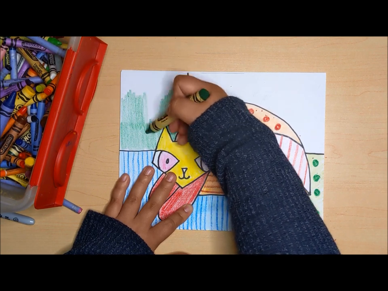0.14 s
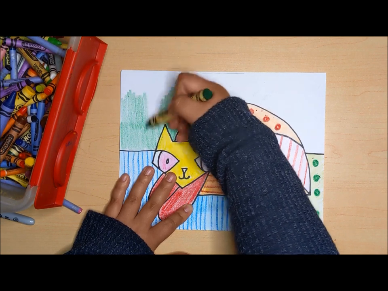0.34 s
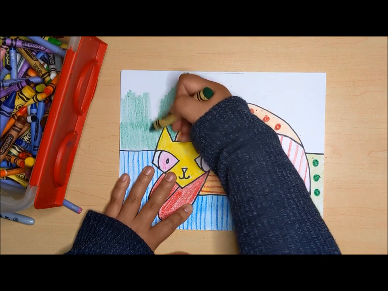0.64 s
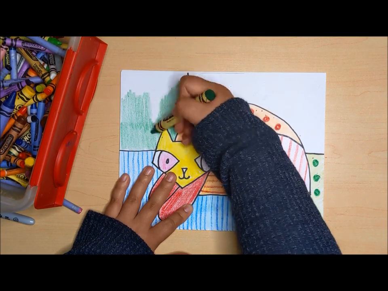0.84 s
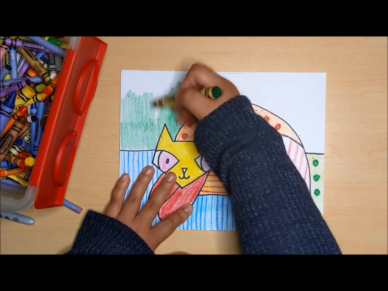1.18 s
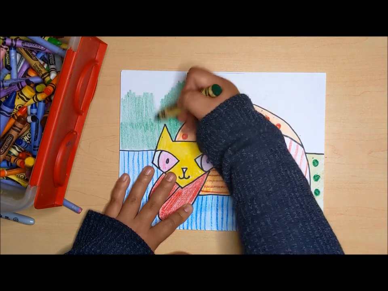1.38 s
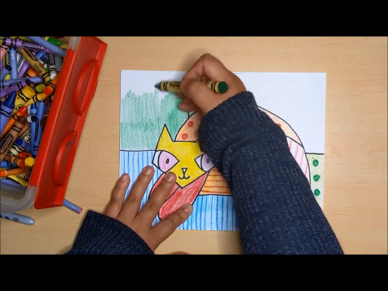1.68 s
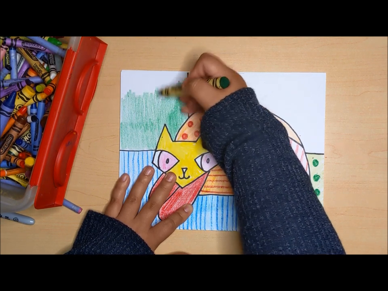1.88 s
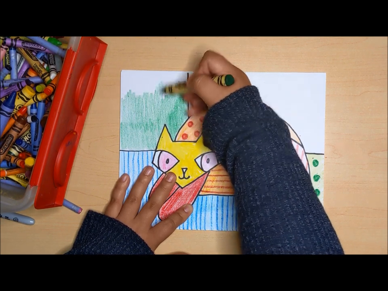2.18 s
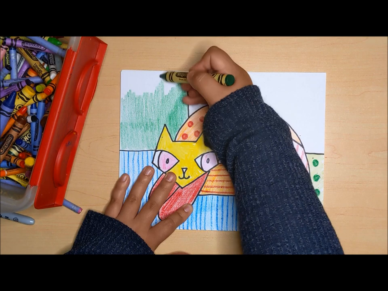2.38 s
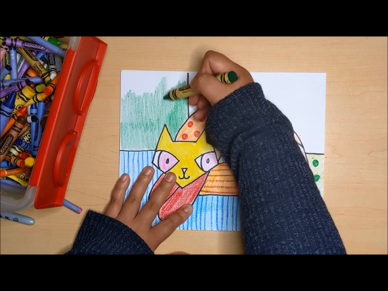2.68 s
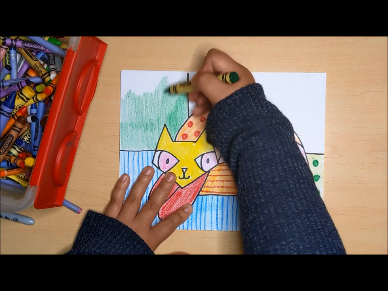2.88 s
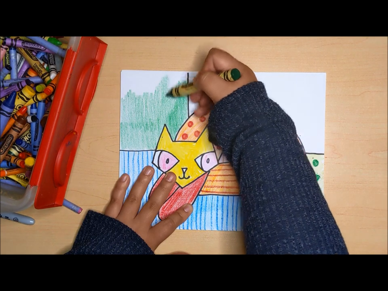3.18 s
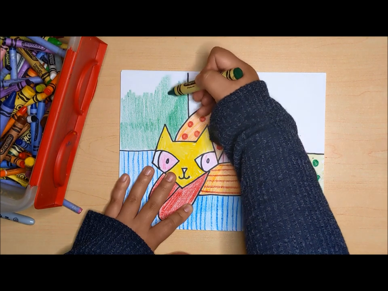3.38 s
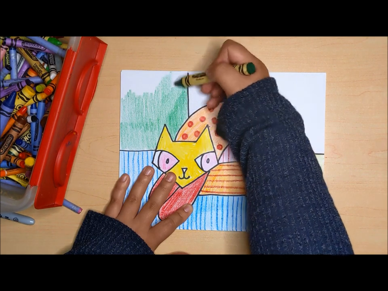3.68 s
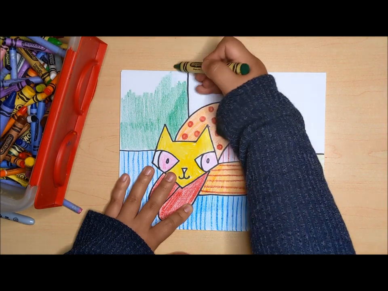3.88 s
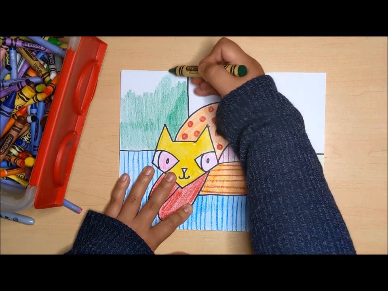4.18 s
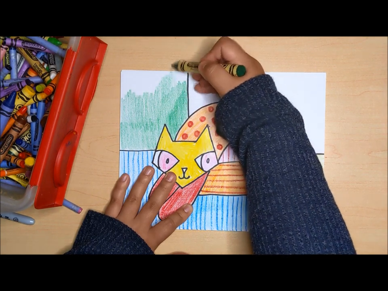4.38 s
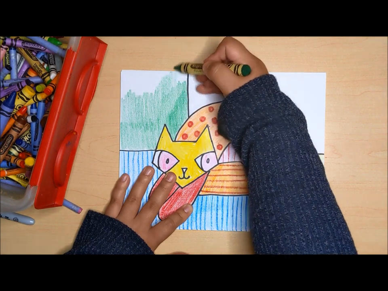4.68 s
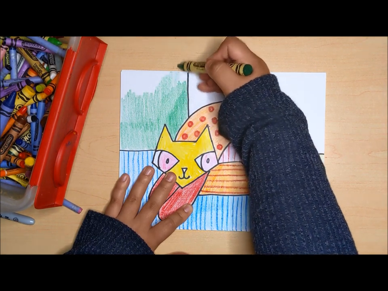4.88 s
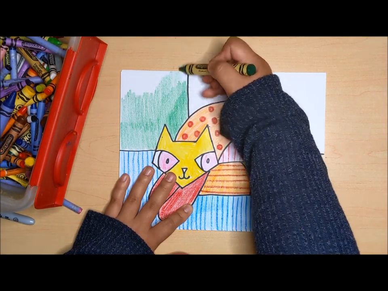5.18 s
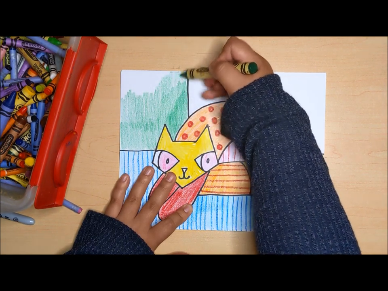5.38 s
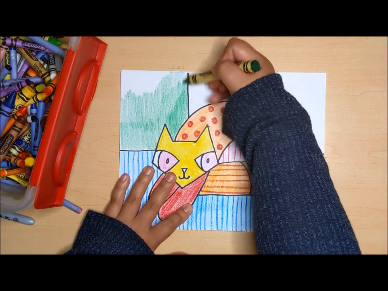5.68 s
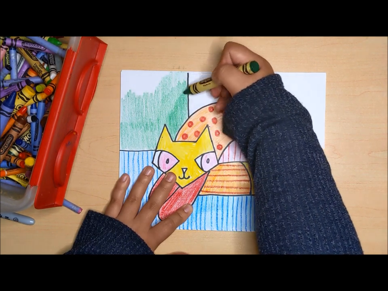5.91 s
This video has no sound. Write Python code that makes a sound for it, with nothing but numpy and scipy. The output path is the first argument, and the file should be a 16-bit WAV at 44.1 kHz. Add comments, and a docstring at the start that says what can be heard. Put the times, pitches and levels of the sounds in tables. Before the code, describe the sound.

A wax crayon rubs quickly back and forth on paper, each stroke a soft, grainy hiss with a slight rumble from the wooden table. A little past halfway, it changes to short single drags that end in much louder, sharp knocks. The hand thumps softly between them, and the paper ticks and slides briefly. Heard close up in a small, quiet room.

```python
"""A wax crayon on paper on a wooden table, heard from close by on a stereo pair in a small quiet room.
First it colours back and forth: each stroke hisses on the paper grain and shakes the table top.
Around 3 s a faint hum swells and fades. From 3.7 s single drags end in hard knocks that snap through
the air and ring through the table and the room. Between them the hand lands with soft thumps,
and from 4.5 s the paper now and then ticks or slides under the hand."""
import sys
import numpy as np
from scipy import signal
from scipy.fft import rfft, irfft, next_fast_len
from scipy.io import wavfile

SR = 44100
rng = np.random.default_rng(int(sys.argv[2]) if len(sys.argv) > 2 else 0)


def output_pcm(signal):
    """Save a mono or channel-first signal as 16-bit PCM at the path in sys.argv[1].

    Samples are clipped to [-1, 1] before scaling.
    """
    pcm = np.clip(np.atleast_2d(signal).T, -1, 1) * 32767
    wavfile.write(sys.argv[1], SR, np.round(pcm).astype(np.int16))


N = 266788

# colour of the room tone: f/Hz, relative level/dB
AIR_COLOUR = [(15, -29), (25, 8), (123, 5.5), (439, -1), (489, -2), (1070, -10), (1370, -6.5), (1700, -11),
              (6560, -22), (7110, -22.5), (10700, -25), (12200, -29), (16000, -31)]
# partials of the hum at its loudest: f/Hz, level/dB
HUM_PARTIALS = [(59.2, -64.5), (118.4, -78)]
# colour of the room tail: f/Hz, relative level/dB
TAIL_COLOUR = [(41, -41), (70, -8.5), (105, -1), (178, -6), (293, -7.5), (403, -1.5), (506, -17.5),
               (620, -5.5), (727, -23), (815, -17.5), (1930, -10), (2840, -17.5), (3740, -19.5),
               (4800, -28), (8860, -35.5), (16000, -44)]
# first echoes off near surfaces: delay/s, left level/dB, right level/dB
NEAR_ECHOES = [(.0072, -20, -18.5), (0.0102, -7, -10.5)]
# the sheet slides under the hand: middle t/s, length/s, level/dB
SHEET_SLIDES = [(5.045, 0.091, -53), (5.137, 0.17, -66), (5.415, 0.063, -55.5)]
# colour of its rustle: f/Hz, relative level/dB
RUSTLE_COLOUR = [(1180, -20), (2000, 9), (2420, 1), (4300, 4.5), (5300, 3), (6470, 1), (7440, 4),
                 (9330, 4.5), (16000, -5)]
# ticks of the paper: t/s, level/dB, centre f/Hz
PAPER_TICKS = [(4.4857, -44, 5020), (4.9477, -35, 9400), (4.9781, -43.5, 12000), (4.9834, -40, 11900),
               (5.408, -21.5, 7950)]
# modes of the table top: f/Hz, level/dB, t60/s, sign of the first swing
TABLE_MODES = [(88, -31, .136, -1), (139, -27, .2, -1), (174, -17, .12, 1), (225, -28, .06, -1),
               (252, -35, .3, 1), (292, -15, .07, -1), (365, -17, .06, -1), (408, -12, .13, -1),
               (444, -15, .055, 1), (572, -14, .055, 1), (588, -26, .2, 1), (651, -13, .03, 1),
               (784, -15, .01, 1), (836, -30, .15, 1), (1036, -15, .01, -1), (1234, -23, .046, 1),
               (1388, -15, .039, -1), (1466, -24, .052, -1), (1526, -16, .035, -1), (1595, -18, .059, -1),
               (1890, -32, .084, 1), (1954, -22, .057, -1), (2096, -25, .16, -1), (2235, -28, .15, 1),
               (2312, -24, .116, 1), (2428, -27, .12, -1), (3000, -22, .01, 1), (3806, -29, .09, 1),
               (3945, -17, .014, 1), (4110, -19, .012, -1)]
# soft landings of the hand: t/s, blow level/dB, contact/ms
HAND_THUMPS = [(3.9488, -17.5, 3.34), (4.2284, -15.5, 1.47), (4.3441, -31.5, 1.1), (4.4868, -14.5, 1.34),
               (4.7444, -14.5, 2.6), (4.986, -16, 2.6), (5.2461, -18, 1.44), (5.4928, -43, 1.1),
               (5.8058, -14.5, 1.16)]
# hard knocks of the crayon: t/s, air snap level/dB, blow level/dB
CRAYON_KNOCKS = [(3.683, -16.5, -9.5), (4.0775, -36, -22), (4.584, -14.5, -10), (4.849, -19, -11.5),
                 (5.0815, -16.5, -6.5), (5.3546, -17, -11.5), (5.611, -16.5, -7.5), (5.9333, -18.5, -11)]
# colouring, one out-and-back swing a row: middle of the out stroke t/s, hiss level/dB, rumble level/dB
COLOURING_SWINGS = [(-0.05, -56.5, -53.5), (0.193, -53.5, -51), (0.427, -56, -51), (0.663, -54, -51),
                    (0.903, -56, -53), (1.14, -54, -51), (1.384, -55, -53.5), (1.617, -53.5, -48.5),
                    (1.851, -56, -53.5), (2.083, -57, -54.5), (2.3, -58, -55.5), (2.529, -58.5, -56),
                    (2.758, -57.5, -58), (2.985, -58.5, -62.5), (3.202, -57.5, -60), (3.43, -58, -65)]
# single drags of the crayon: middle t/s, length/s, hiss level/dB, rumble level/dB
CRAYON_DRAGS = [(3.68, 0.074, -54.5, -55.5), (3.866, 0.071, -63, -77), (4.055, 0.05, -55, -56),
                (4.312, 0.052, -57.5, -55.5), (4.586, 0.074, -54, -47.5), (4.831, 0.065, -55, -55),
                (5.338, 0.068, -55.5, -56.5), (5.596, 0.096, -59, -65), (5.904, 0.037, -56.5, -53.5)]
# colour of wax on paper grain: f/Hz, relative level/dB
HISS_COLOUR = [(530, -49), (900, -4.5), (1190, -11), (1350, 1), (2030, -16), (3020, -11), (3570, -20.5),
               (4280, -7), (4820, -18), (5440, -8.5), (6060, -17), (6990, -10.5), (12400, -7.5),
               (14000, -10), (15800, -12)]
# likeness of diffuse sound at the two capsules: f/Hz, correlation
CAPSULE_LIKENESS = [(60, 0.79), (130, 0.51), (290, 0.33), (640, 0.7), (1410, 0.16), (3100, 0.16),
                    (6820, -0.17), (15000, 0.28)]
# balance of the pair: f/Hz, left minus right level/dB
CAPSULE_BALANCE = [(60, -5.5), (110, -4.5), (200, -4), (380, 1), (700, -2), (1290, -3.0), (2380, -3.5),
                   (4400, -3.5), (8120, -4.5), (15000, -12.5)]
# peak and dips of the microphone housing: f/Hz, width/Hz, level/dB
HOUSING_COLOUR = [(12100, 1800, 0.5), (14100, 890, -11), (15200, 900, -2.5)]

BENDING_LAG = .068   # travel time through the wood, s times root Hz: low bending waves come later
KNOCK_MS, SOFTENS = 0.014, 0.87   # contact of a 0 dB blow; it lengthens by this many dB for each dB less
TOUCH_DB, TOUCH_LEAD_S, TOUCH_MS = -19, .0052, 0.33   # a light touch, under and before each knock
AIR_LAG_S = .0007   # the snap through the air starts this long after the contact
OUT_S, BACK_S = .05, 0.046   # lengths of the out and back strokes
OUT_RISE = 1.12   # the out stroke gathers speed this much more slowly than it stops
TURN_S, TURN_QUICKENS = 0.11, 0.0057   # lag of the back stroke, and how much it shrinks each second
BACK_HISS_DB, BACK_RUMBLE_DB = 0.7, 1.5   # the back stroke presses a little harder


def from_db(db):
    """Decibels to gain."""
    return 10 ** (np.asarray(db) / 20)


def rms_one(x):
    """Scale to unit rms."""
    return x / np.sqrt(np.mean(x ** 2) + 1e-20)


def at_hz(points, size):
    """A table of f/Hz and value, read at every bin of a spectrum."""
    hz = np.maximum(np.arange(size // 2 + 1) * SR / size, 1)
    point_hz, values = np.array(points).T
    return np.interp(np.log(hz), np.log(point_hz), values)


def add(out, s, pulse):
    """Lay a pulse into a track at time s."""
    at = round(s * SR)
    out[at:at + len(pulse)] += pulse[:N - at]


def drift(rate_hz):
    """Random wander below rate_hz; rms 1."""
    lowpass = signal.butter(2, rate_hz, fs=SR, output="sos")
    return rms_one(signal.sosfilt(lowpass, rng.standard_normal(N + SR))[SR:])


def swell(s, length, rise=1, steepness=2.52):
    """An envelope that swells to 1 at time s and dies away."""
    late, out = 2 * (np.arange(N) / SR - s) / length, np.zeros(N)
    moving = np.abs(late) < 6
    out[moving] = np.exp(-.35 * np.maximum(late, -late / rise)[moving] ** steepness)
    return out


def diffuse_noise(colour, count):
    """Noise from all round the pair, alike in the bass and nearly unrelated in the treble; rms 1."""
    size = next_fast_len(count)
    mid, side = rfft(rng.standard_normal((2, size))) * from_db(at_hz(colour, size))
    alike = np.clip(at_hz(CAPSULE_LIKENESS, size), -1, 1)
    pair = np.sqrt(1 + alike) * mid + np.sqrt(1 - alike) * side * [[1], [-1]]
    return rms_one(irfft(pair, size)[:, :count])


def room_tone(air_db=-56):
    """The bed of the quiet room: steady air noise and a faint hum that swells once."""
    t = np.arange(N) / SR
    air = from_db(air_db + drift(rate_hz=7)) * diffuse_noise(AIR_COLOUR, N)
    hum = sum(np.sqrt(2) * from_db(db) * np.sin(2 * np.pi * hz * t) for hz, db in HUM_PARTIALS)
    return air + hum * swell(3.05, length=.6)


def room_tail(excitation, t60_s=0.26, gain_db=-17):
    """The walls answer: a dense tail that builds over a few milliseconds and dies evenly."""
    t = np.arange(SR // 2) / SR
    build = 1 - np.exp(-np.maximum(t - .003, 0) / .004)
    tail = diffuse_noise(TAIL_COLOUR, SR // 2) * from_db(-60 * t / t60_s) * build
    return from_db(gain_db) * signal.fftconvolve(excitation[None], tail, axes=1)[:, :N]


def near_echoes(sound, band_hz=(1700, 7800)):
    """Near surfaces throw one band of a sound back to the microphones."""
    band = signal.sosfilt(signal.butter(2, band_hz, "band", fs=SR, output="sos"), sound)
    out = np.zeros((2, N))
    for delay, *side_db in NEAR_ECHOES:
        for side, db in zip(out, side_db):
            add(side, delay, from_db(db) * band)
    return out


def sheet_slides():
    """Paper slides on wood under the hand with an uneven rustle."""
    envelope = sum(from_db(db) * swell(s, length) for s, length, db in SHEET_SLIDES)
    return envelope * from_db(2 * drift(rate_hz=60)) * diffuse_noise(RUSTLE_COLOUR, N)


def air_snaps(knock_hz=9500, decay_ms=1.0, band_ratio=1.63):
    """Knock fronts and paper ticks: tiny bright bursts, straight through the air to the pair."""
    out, t = np.zeros(N), np.arange(300) / SR
    envelope = np.exp(-1000 * t / decay_ms) * np.minimum(t / 0.00021, 1)
    fronts = [(s, snap_db, knock_hz) for s, snap_db, _ in CRAYON_KNOCKS]
    for s, db, hz in fronts + list(PAPER_TICKS):
        burst = rng.standard_normal(len(t)) * envelope
        edges_hz = [hz / band_ratio, min(hz * band_ratio, .45 * SR)]
        band = signal.butter(2, edges_hz, "band", fs=SR, output="sos")
        add(out, s, from_db(db) * signal.sosfilt(band, burst))
    return out


def push(contact_ms):
    """Force of one contact, a smooth hump of unit area: the longer, the duller."""
    hump = np.sin(np.pi * np.clip((np.arange(200) + .5) / (contact_ms * SR / 1000), 0, 1)) ** 2
    return hump / hump.sum()


def table_top(force, ring_share=1, spot_db=1.5, spot_s=.12):
    """The wood rings in its modes; each arrives after its own travel time."""
    out, spot = np.zeros(N), (np.arange(N) / SR / spot_s).astype(int)
    for hz, level_db, t60, direction in TABLE_MODES:
        radius, angle = from_db(-60 / (ring_share * t60 * SR)), 2 * np.pi * hz / SR
        # the mode's strength wanders as the blows land on new spots
        struck = force * from_db(spot_db * rng.standard_normal(spot[-1] + 1))[spot]
        feedback = [1, -2 * radius * np.cos(angle), radius * radius]
        rung = signal.lfilter([0, np.sin(angle)], feedback, struck + 1e-18)
        add(out, BENDING_LAG / np.sqrt(hz), direction * from_db(level_db) * rung)
    return out


def hand_thumps():
    """Force of the hand landing on the table: long, soft contacts."""
    force = np.zeros(N)
    for s, blow_db, contact_ms in HAND_THUMPS:
        add(force, s, from_db(blow_db) * push(contact_ms))
    return force


def crayon_knocks():
    """Force of the crayon striking: a light touch, then a blow that is shorter the harder it is."""
    force = np.zeros(N)
    for s, _, blow_db in CRAYON_KNOCKS:
        add(force, s - TOUCH_LEAD_S, from_db(blow_db + TOUCH_DB) * push(TOUCH_MS))
        add(force, s - AIR_LAG_S, from_db(blow_db) * push(KNOCK_MS * from_db(-SOFTENS * blow_db)))
    return force


def crayon_strokes():
    """Envelopes of hiss and rumble: the speed of the tip within each stroke drives both."""
    strokes = [(*drag, 1) for drag in CRAYON_DRAGS]
    for s, hiss_db, rumble_db in COLOURING_SWINGS:
        back_at = s + TURN_S - TURN_QUICKENS * s
        strokes.append((s, OUT_S, hiss_db, rumble_db, OUT_RISE))
        strokes.append((back_at, BACK_S, hiss_db + BACK_HISS_DB, rumble_db + BACK_RUMBLE_DB, 1))
    hiss, rumble = np.zeros((2, N))
    for s, length, hiss_db, rumble_db, rise in strokes:
        speed = swell(s, length, rise)
        hiss += from_db(hiss_db) * speed
        rumble += from_db(rumble_db) * speed
    return hiss, rumble


def paper_grain(per_s, spread_db):
    """Wax catching on paper fibres: dense clicks of uneven size; rms 1."""
    sizes = from_db(spread_db * np.minimum(rng.exponential(1, N), 4)) * rng.choice([-1, 1], N)
    return rms_one(sizes * (rng.random(N) < per_s / SR))


def crayon_rumble(envelope):
    """Force of the coarser catches that shake the table top, softened by the wax."""
    force = signal.lfilter(push(contact_ms=2.16), [1], paper_grain(per_s=2000, spread_db=2.5))
    return envelope * from_db(drift(rate_hz=34)) * force / np.std(table_top(force))


def crayon_hiss(envelope):
    """Fine grain in the colour of the paper, mostly scattered; the direct part arrives right first."""
    grain = paper_grain(per_s=17000, spread_db=2.0)
    at_tip = irfft(rfft(grain) * from_db(at_hz(HISS_COLOUR, N)), N)
    direct = rms_one(np.array([np.roll(at_tip, 6), at_tip]))
    scattered = diffuse_noise(HISS_COLOUR, N)
    return envelope * from_db(1.2 * drift(rate_hz=71)) * (0.2 * direct + 0.97 * scattered)


def scene():
    """All sources at the pair; the wood reaches the left capsule two samples late, the air six."""
    hiss_envelope, rumble_envelope = crayon_strokes()
    thumps, knocks, snaps = hand_thumps(), crayon_knocks(), air_snaps()
    wood = table_top(knocks + crayon_rumble(rumble_envelope))
    wood += table_top(thumps, ring_share=0.8)   # the resting hand damps the ring
    direct = np.array([np.roll(wood, 2) + np.roll(snaps, 6), wood + snaps])
    reflected = near_echoes(wood) + room_tail(thumps + knocks + from_db(-23) * snaps)
    return direct + reflected + crayon_hiss(hiss_envelope) + sheet_slides() + room_tone()


def record(dry):
    """The pair: less treble on the left, a housing that colours the top, a low cut and a steep top cut."""
    size = next_fast_len(N)
    bin_hz = np.arange(size // 2 + 1) * SR / size
    lean_db = at_hz(CAPSULE_BALANCE, size) / 2
    housing_db = sum(db * np.exp(-(2 * (bin_hz - hz) / width) ** 2) for hz, width, db in HOUSING_COLOUR)
    response = from_db([housing_db + lean_db, housing_db - lean_db])
    pair = irfft(rfft(dry, size) * response, size)[:, :N]
    pair = signal.sosfilt(signal.butter(2, 65, "high", fs=SR, output="sos"), pair)
    return signal.sosfilt(signal.cheby2(28, 55, 15850, "low", fs=SR, output="sos"), pair)


dry = scene()
out = record(dry)
output_pcm(out)
```